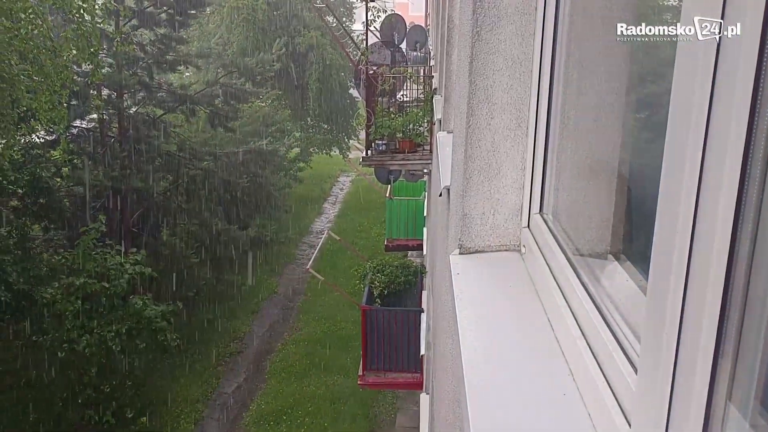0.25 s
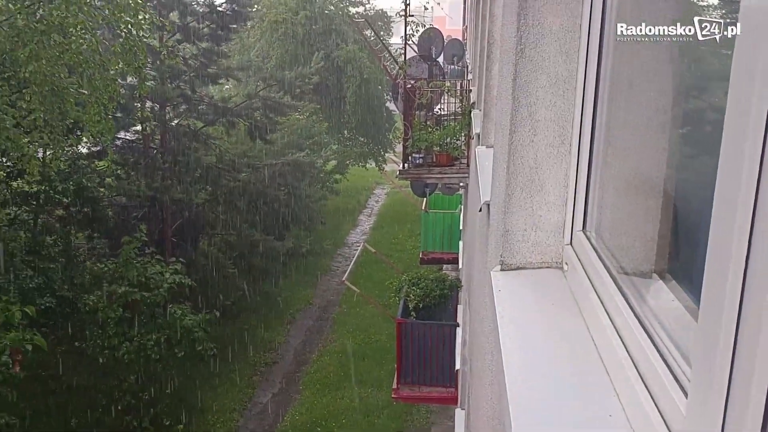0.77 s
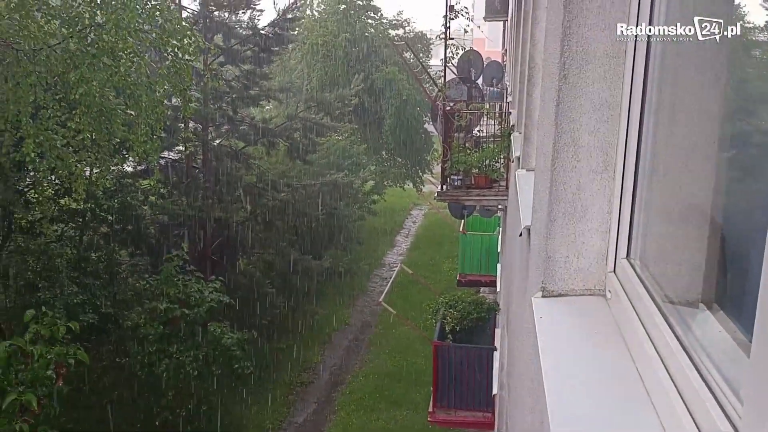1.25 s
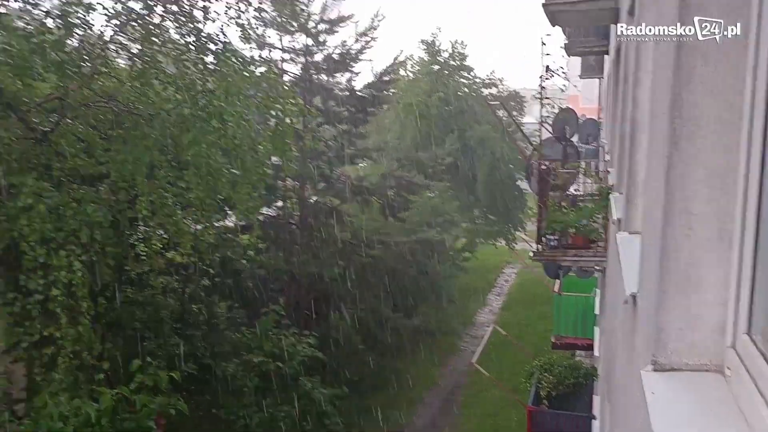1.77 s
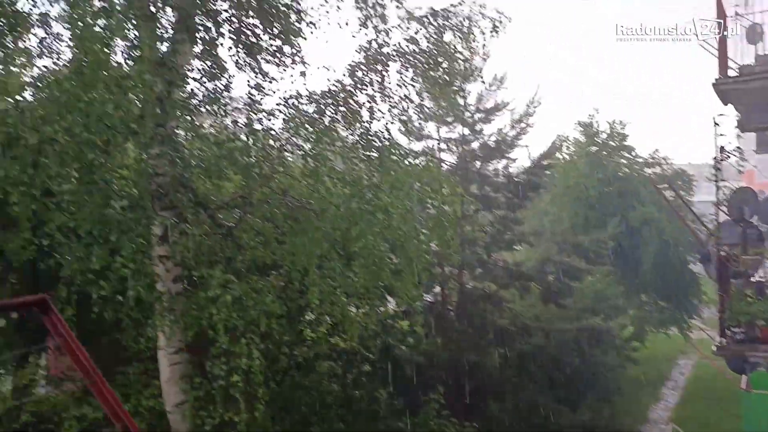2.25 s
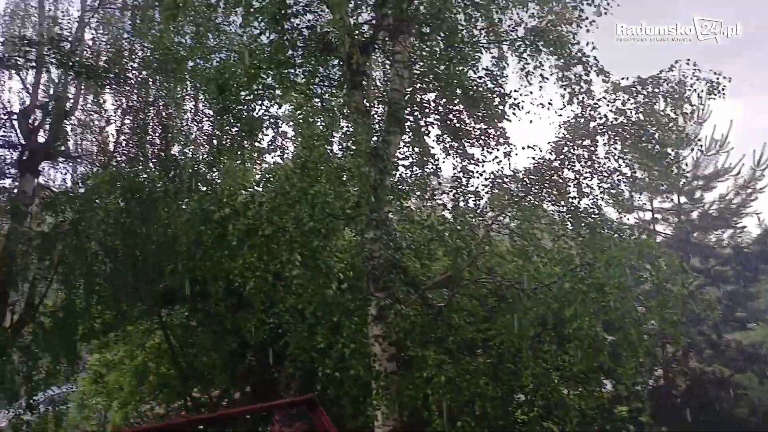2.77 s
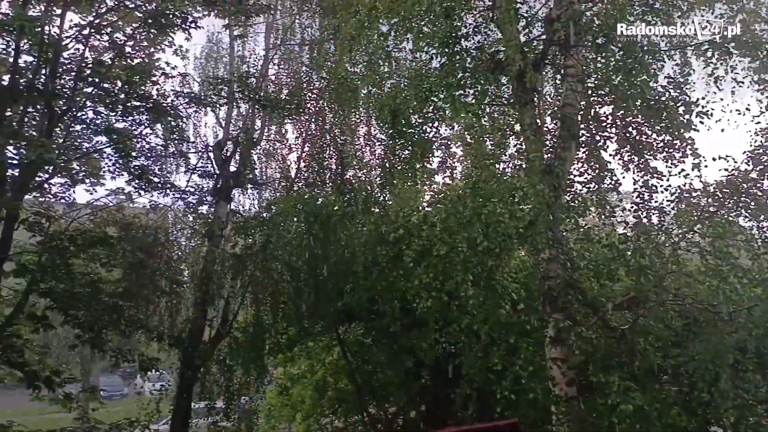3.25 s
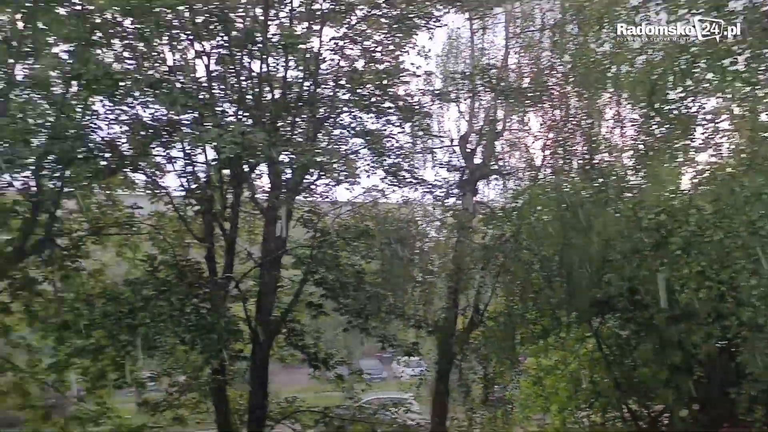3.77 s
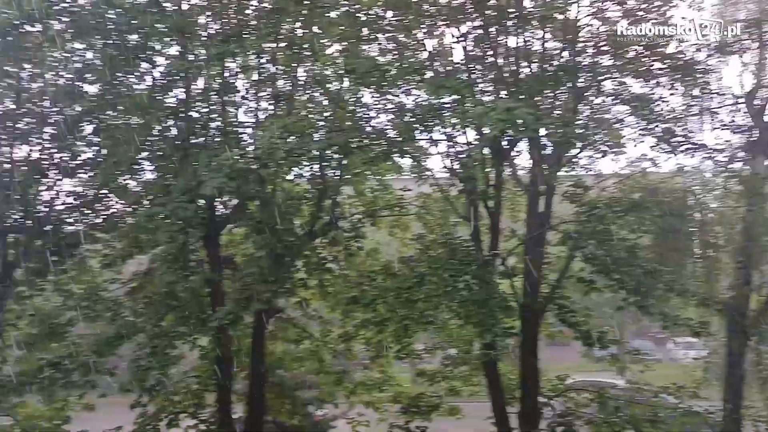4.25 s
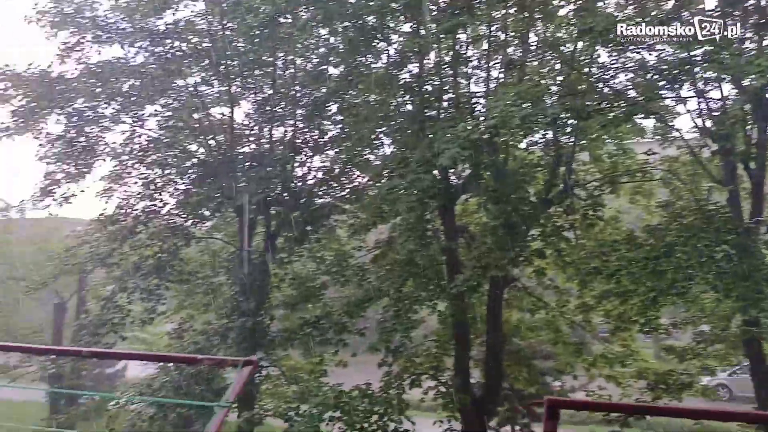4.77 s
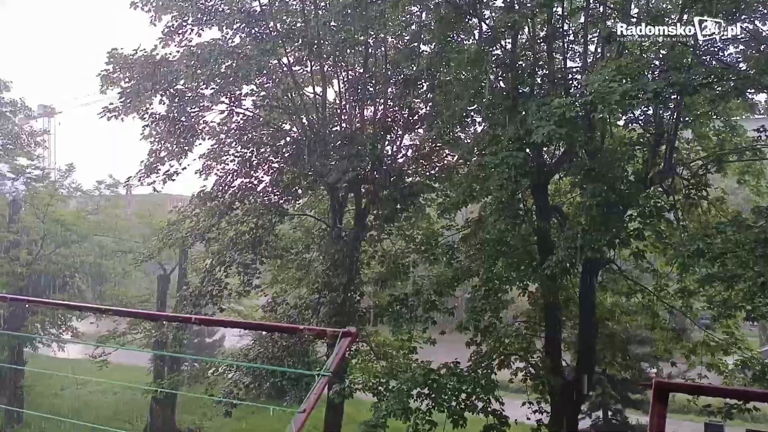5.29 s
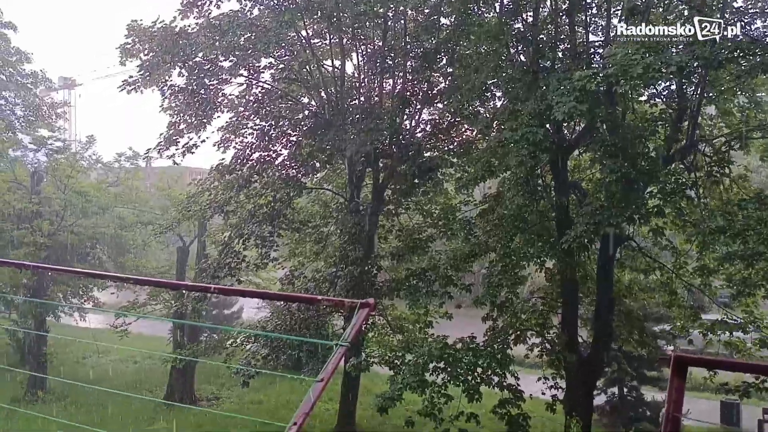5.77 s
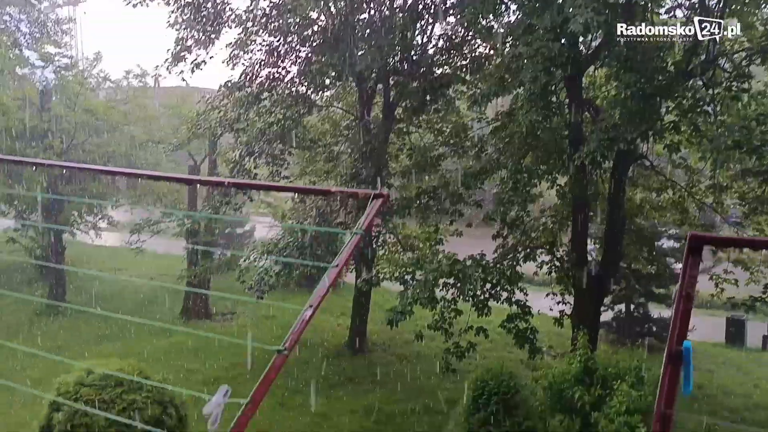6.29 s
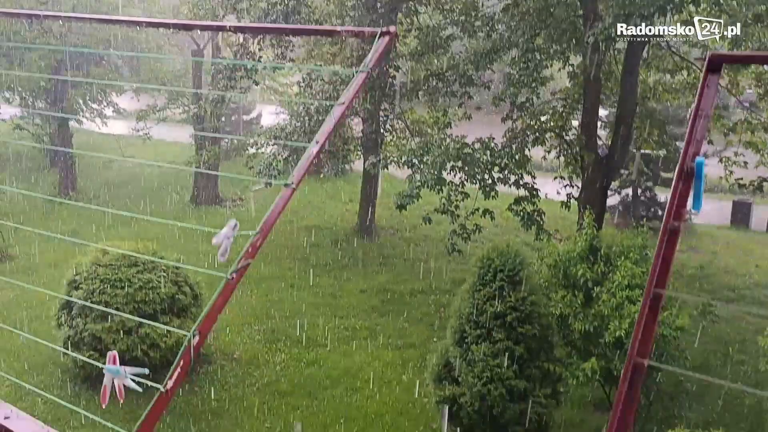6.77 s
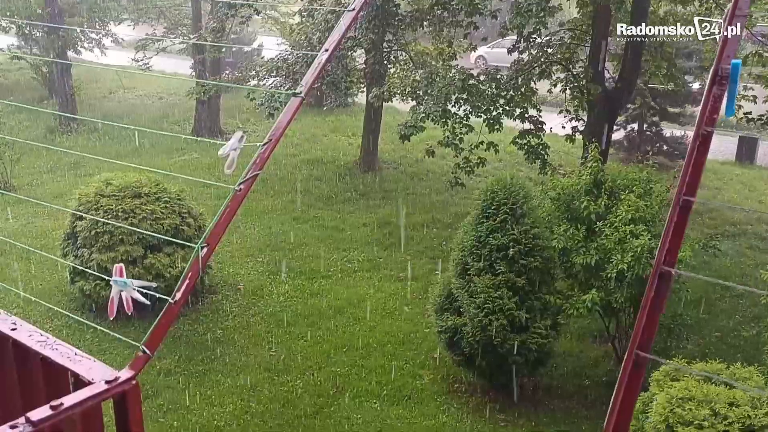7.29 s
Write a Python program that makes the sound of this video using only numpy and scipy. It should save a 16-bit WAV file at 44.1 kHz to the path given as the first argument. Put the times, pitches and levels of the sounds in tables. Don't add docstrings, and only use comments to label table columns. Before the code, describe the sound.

Outdoors on a balcony above trees and lawn, steady heavy rain makes a dense, even hiss with small pops on leaves. Large drops knock irregularly on sheet metal, clustering around the middle and again after six seconds, with fine ticks and spits close by. Faint gutter gurgling and a distant engine drone lie far beneath. A small phone-like microphone makes it narrow, nearly mono and slightly pumping after hard hits.

```python
import sys
import numpy as np
from scipy import signal
from scipy.fft import rfft, irfft, dct
from scipy.io import wavfile

SR = 44100
rng = np.random.default_rng(int(sys.argv[2]) if len(sys.argv) > 2 else 0)


def output_pcm(signal):
    pcm = np.clip(np.atleast_2d(signal).T, -1, 1) * 32767
    wavfile.write(sys.argv[1], SR, np.round(pcm).astype(np.int16))


def field_ratio(decibels):
    return 10 ** (np.asarray(decibels, dtype=float) / 20)


N = 332072


def rms_one(x):
    return x / np.sqrt(np.mean(x ** 2) + 1e-20)


def in_time(rows):
    s, *columns = np.transpose(rows)
    return [np.interp(np.arange(N) / SR, s, c) for c in columns]


def band(x, low_hz, high_hz, order=2):
    sos = signal.butter(order, [low_hz, min(high_hz, 0.45 * SR)], "band", fs=SR, output="sos")
    return signal.sosfilt(sos, x)


def brick_wall(x, low_hz, high_hz):
    hz = np.arange(N // 2 + 1) * SR / N
    return irfft(rfft(x) * (hz > low_hz) * (hz < high_hz), N)


def drift(rate_hz):
    r = np.exp(-80 * np.pi * rate_hz / SR)
    chance = rng.standard_normal(N // 40 + 2002)
    slow = signal.lfilter([1], [1, -2 * r, r * r], chance)[2000:]
    return np.interp(np.arange(N) / 40, np.arange(len(slow)), rms_one(slow))


def ring(x, hz, t60):
    r, w = field_ratio(-60 / (t60 * SR)), 2 * np.pi * hz / SR
    return signal.lfilter([0, np.sin(w)], [1, -2 * r * np.cos(w), r * r], x + 1e-18)


def dips(rows, fall_s, rise_s):
    t, out = np.arange(N) / SR, np.zeros(N)
    for s, depth_db, hold in rows:
        corners = [s - fall_s, s + fall_s, s + hold - rise_s / 2, s + hold + rise_s / 2]
        out += depth_db * np.interp(t, corners, [0, 1, 1, 0])
    return out


def gate(rows, shut_db):
    open_s, close_s = 0.029, 0.041
    t, out = np.arange(N) / SR, shut_db + np.zeros(N)
    for s, length, level_db in rows:
        opened = s + open_s / 2
        closing = max(s + length - close_s / 2, opened)
        shape = np.interp(t, [s - open_s, opened, closing, s + length + close_s], [0, 1, 1, 0])
        out = np.maximum(out, shut_db + (level_db - shut_db) * shape)
    return out


def drops(per_s, spread_db, cap):
    sizes = field_ratio(spread_db * np.minimum(rng.exponential(1, N), cap)) * rng.choice([-1, 1], N)
    return rms_one(sizes * (rng.random(N) < per_s / SR))


def rain():
    # t/s, rain level/dB, spray against the rain/dB
    downpour = [
        (0.0, -21.5, -0.5),
        (1.03, -22, 1),
        (1.32, -21.5, 1),
        (1.51, -21.5, 0),
        (5.3, -21.5, 1),
        (6.52, -22, 0.5),
        (7.17, -21.5, 1),
        (7.53, -22.5, 2.5),
    ]
    rain_db, spray_db = in_time(downpour)
    together, hiss = drift(7.7), 0
    white, edges = rng.standard_normal((2, N)), 90 * 2 ** np.arange(0, 8.1, 0.5)
    for k, (low, high) in enumerate(zip(edges, edges[1:])):
        flicker_db = 0.36 * together + 1.16 * drift(14.3)
        hiss = hiss + field_ratio(flicker_db + spray_db * (low > 7000)) * band(white[k % 2], low, high)

    near, dealt, pops = drops(1200, spread_db=4.5, cap=3.37), rng.integers(0, 14, N), 0
    for k, hz in enumerate(np.geomspace(600, 7000, 14)):
        pops = pops + rms_one(ring(near * (dealt == k), hz, 11.8 / hz)) * np.sqrt(hz)
    spray = band(drops(200, spread_db=1.0, cap=6.0), 8100, 17000)
    wet = rms_one(hiss) + field_ratio(-15.0) * rms_one(pops) + field_ratio(-7.5) * rms_one(spray)
    return field_ratio(rain_db) * rms_one(colour(wet))


def colour(x):
    # f/Hz, level/dB per Hz
    body = [(53, -50), (90, -35), (157, -37), (205, -35), (323, -24), (415, -17), (582, -8), (761, -5.5),
            (963, -7.5), (1350, -3.5), (2390, -1), (3630, -3), (4440, -8.5), (5000, -9), (6500, -39),
            (11000, -120)]
    # f/Hz, level/dB per Hz
    top = [(2940, -30), (5000, 0.5), (5720, -1), (6540, -10), (7160, -6.5), (8550, -4), (10400, -19.5),
           (15100, -12), (15700, -31)]
    points = [p for p in body if p[0] < 4900]
    points += [(hz, db - 9) for hz, db in top if 4900 < hz < 15750]
    point_hz, point_db = np.array(points).T
    hz = np.arange(4097) * SR / 8192 + 1
    cepstrum = irfft(np.log(field_ratio(np.interp(np.log(hz), np.log(point_hz), point_db))))
    cepstrum[1:4096] *= 2
    cepstrum[4097:] = 0
    return signal.fftconvolve(x, irfft(np.exp(rfft(cepstrum))))[:N]


def knocks():
    # t/s, peak level/dB, f/Hz, t60/s
    big = [(0.2622, -5.5, 2470, 0.16), (0.4326, -15, 2800, 0.03), (1.3481, -12, 3240, 0.073),
           (1.502, -8, 2400, 0.05), (1.511, -8, 2400, .05), (1.5904, -7, 2940, 0.091),
           (2.2994, -8, 2400, 0.21), (3.2478, -5.5, 2440, 0.13), (3.2896, -2, 2410, 0.052),
           (3.398, -8, 2500, 0.13), (3.5192, -9, 2500, 0.17), (3.56, -1.5, 2400, 0.22),
           (3.699, -3, 2380, 0.07), (3.75, -10, 2500, 0.3), (3.7888, -5, 2950, 0.1), (3.93, -8, 2650, 0.17),
           (4.8778, -5, 2930, 0.17), (4.978, -9, 2560, 0.15), (5.1537, -4.5, 2010, 0.054),
           (5.1976, -3.5, 2400, 0.14), (5.4194, -6, 3050, 0.058), (5.546, -8, 2340, 0.053),
           (5.9107, -3.5, 2000, 0.065), (5.9783, -5, 2490, 0.17), (6.3994, -10, 2280, 0.12),
           (6.4357, -1.5, 1800, 0.045), (6.5003, -8, 2630, 0.092), (6.6458, -5, 2480, 0.16),
           (6.7592, -7.5, 2660, 0.098), (7.2198, -8, 1880, 0.071)]
    out, t = np.zeros(N + 9000), np.arange(9000) / SR
    chance = rng.standard_normal((len(big), 9000))
    for (s, peak_db, hz, t60), noise in zip(big, chance):
        splash = band(noise * np.exp(-t / 0.0045), 1000, 3800, order=3)
        dying = np.minimum(t / 0.00057, 1) * field_ratio(-60 * t / min(t60, 0.28))
        cluster = band(noise[::-1], hz - 250, hz + 250)[::-1]
        modes = np.tanh(0.41 * rms_one(cluster)) * dying
        share = np.clip(0.56 - 0.012 * peak_db, 0, 1)
        hit = (1 - share) * splash / abs(splash).max() + share * modes / abs(modes).max()
        out[round(s * SR):][:9000] += field_ratio(peak_db - 5.0) * hit
    return band(out[:N], 590, 6400, order=3)


def hard_drops():
    # [(f/Hz, level/dB, t60/s) ..]
    hardest = [
        (0.4727, [(1200, -15, .005), (1520, -9, .007), (1830, -12, .018), (2600, -15, 0.005), (4830, -13, .005)]),
        (6.2915, [(2500, -8, .012), (2850, -10, .007), (3200, -8, 0.009), (4600, -11, .006), (5300, -10, 0.006), (8600, -26, .008)]),
    ]
    out = np.zeros(N)
    for s, modes in hardest:
        slap = np.zeros(N)
        slap[[round((s + lag) * SR) for lag in (0, 0.0006, 0.0019)]] = [0.22, -1, 0.22]
        for hz, level_db, t60 in modes:
            out += field_ratio(level_db) * ring(slap, hz, t60)
    return band(out, 900, 7300, order=3)


def ticks():
    # t/s, port click level/dB, upper treble level/dB
    fine = [(0.1997, -27, -28), (0.6604, -12.5, -37), (0.9, -9, -30), (1.0545, -13, -36),
            (1.2525, -11, -30), (1.4426, -16, -39), (1.5136, -22, -36), (2.3034, -14, -37),
            (2.369, -18, -28), (2.6744, -17, -36), (2.8777, -10.5, -39), (3.7479, -20, -37),
            (3.804, -23, -42), (4.0123, -15, -29), (4.6545, -15, -37), (5.0739, -13, -29),
            (5.225, -13, -31), (5.4535, -19, -36), (5.4755, -20, -36), (5.5134, -17, -37),
            (5.6003, -16, -37), (6.4188, -17, -30), (6.4827, -25, -36), (6.5134, -11, -38),
            (6.6468, -20, -38), (6.8194, -16, -37), (6.961, -17, -37), (7.008, -16, -28),
            (7.0394, -20, -31), (7.4383, -11, -28)]
    out, t = np.zeros(N + 900), np.arange(900) / SR
    chance = rng.standard_normal((len(fine), 900))
    for (s, peak_db, upper_db), noise in zip(fine, chance):
        port = band(noise * np.exp(-t / 0.0028), 6900, 9000)
        upper = band(noise * np.exp(-t / 0.0047), 10000, 17200)
        at = out[round(s * SR):][:900]
        at += field_ratio(peak_db - 5.5) * port / abs(port).max()
        at += field_ratio(upper_db + 6.0) * upper / abs(upper).max()
    return out[:N]


def spits():
    # t/s, peak level/dB, lower edge f/Hz
    shatters = [
        (.432, -16, 5350),
        (1.252, -23, 14000),
        (3.288, -25, 12500),
        (3.598, -31, 10500),
        (3.697, -26, 11800),
        (6.419, -25, 13000),
        (7.04, -18, 14200),
        (7.438, -25, 12600),
    ]
    out, t = np.zeros(N + 900), np.arange(900) / SR
    chance = rng.standard_normal((len(shatters), 900))
    for (s, peak_db, hz), noise in zip(shatters, chance):
        burst = band(noise * np.exp(-t / 0.0018), hz, hz * 1.19)
        out[round(s * SR):][:900] += field_ratio(peak_db) * burst / abs(burst).max()
    return out[:N]


def ping():
    t = np.clip(np.arange(N) / SR - 0.198, 0, None)
    swell = np.minimum(t / 0.012, 1) * field_ratio(-60 * t / 0.25)
    return field_ratio(-20.5) * swell * np.sin(2 * np.pi * 4780 * t)


def gurgle(sink_db):
    # start t/s, length/s, level/dB
    low_open = [(0.248, 0.14, -50), (1.033, 0.062, -51), (1.678, 0.04, -44), (1.771, 0.046, -48),
                (1.866, 0.12, -46), (2.906, 0.058, -44), (3.022, 0.046, -44), (3.327, 0.108, -51),
                (3.717, 0.116, -44.5), (4.035, 0.032, -50), (4.205, 0.036, -47), (4.412, 0.038, -49),
                (4.59, 0.03, -50), (5.044, 0.091, -44), (5.852, 0.041, -49), (6.13, 0.034, -44),
                (6.484, 0.032, -50)]
    # start t/s, length/s, level/dB
    upper_open = [(0.063, 0.04, -48), (0.749, 0.058, -52), (1.462, 0.068, -48), (1.72, 0.43, -44.5),
                  (2.912, 0.11, -47), (3.126, 0.17, -48), (3.32, 0.166, -44), (3.568, 0.32, -42),
                  (3.963, 0.13, -45.5), (4.227, 0.22, -44), (4.608, 0.068, -45), (4.992, 0.62, -45),
                  (6.106, 0.18, -44), (6.464, 0.085, -42), (6.716, 0.11, -46), (6.935, 0.078, -47),
                  (7.106, 0.12, -47.5)]
    low_leak_db = -54.5 - 0.56 * np.arange(N) / SR
    low_db = gate(low_open, low_leak_db) + 2.5 * drift(5.5) + sink_db
    upper_db = gate(upper_open, -66.5) + sink_db
    noise = rng.standard_normal((2, N))
    low = band(noise[0], 286.4, 380, order=3) * field_ratio(0.9 * drift(5.0))
    upper = band(noise[1], 398, 549, order=4) * field_ratio(2.0 * drift(9.3))
    return field_ratio(low_db - 0.2) * rms_one(low) + field_ratio(upper_db + 1.2) * rms_one(upper)


def engine():
    # t/s, f/Hz
    pitch = [(0, 62), (1.6, 62), (2.5, 67), (4.1, 69), (5.2, 75), (6.1, 79), (7.53, 80)]
    # start t/s, length/s, level/dB
    drone_open = [(0.782, 0.066, -63), (1.35, 5.5, -71), (1.383, 0.034, -65), (1.535, 0.27, -64),
                  (2.061, 0.19, -61), (2.389, 1.11, -60), (3.801, 0.56, -59.5), (4.522, 0.07, -62),
                  (4.68, 0.098, -62), (4.83, .05, -57), (4.96, 0.59, -61.5), (5.653, 0.6, -61),
                  (6.378, 0.142, -60), (6.739, 0.044, -62)]
    drone_db = gate(drone_open, -80) + 1.2 * drift(13)
    noise = rng.standard_normal((2, N))
    hz = in_time(pitch)[0] + 2.5 * drift(4.1)
    note = np.sqrt(2) * np.sin(2 * np.pi * np.cumsum(hz) / SR) * field_ratio(0.82 * drift(7.4))
    note *= np.clip((drone_db + 73) / 12, 0, 1)
    drone = note + field_ratio(-4.0) * rms_one(band(noise[0], 70, 108))
    sub = field_ratio(-86 + 3.5 * drift(3)) * rms_one(band(noise[1], 18, 60))
    return field_ratio(drone_db) * drone + sub


def scene():
    # t/s, depth/dB, hold/s
    ducks = [(0.484, -6.1, 0.049), (1.173, -5, 0.045), (1.312, -3.5, 0.051), (1.52, -3.5, 0.015),
             (2.13, -1, 0.023), (2.375, -2, 0.027), (2.59, -3.5, 0.027), (3.099, -5, 0.037),
             (3.606, -4, 0.051), (5.479, -5.5, 0.023), (5.924, -4, 0.018), (5.989, -3, 0.031),
             (6.072, -2.2, 0.014), (6.304, -4, 0.061), (6.443, -5, 0.023), (6.52, -1.5, 0.026),
             (6.632, -5.5, 0.013), (6.774, -5, 0.042), (6.871, -2.7, 0.019), (7.359, -6, 0.03)]
    # t/s, depth/dB, hold/s
    gaps = [
        (3.551, -6, .008),
        (1.492, -6, .007),
        (6.636, -3, .008),
    ]
    # t/s, depth/dB, hold/s
    clamps = [
        (.62, -12, 0.065),
        (1.17, -22, 0.09),
        (3.06, -12, .05),
        (4.1, -8, .04),
        (4.7, -12, .05),
        (5.47, -10, 0.057),
        (6.4, -10, .04),
        (6.57, -16, 0.054),
        (7.44, 1, .07),
    ]
    t = np.arange(N) / SR
    leaves = rain()
    rumble = field_ratio(1.0 - 0.5 * t + 3.0 * drift(5)) * band(leaves, 95, 263, order=3)
    high_pass = signal.butter(14, 505, "high", fs=SR, output="sos")
    leaves = signal.sosfilt(high_pass, leaves) + rumble
    duck_db = dips(ducks, fall_s=0.0046, rise_s=0.017)
    gap_db = dips(gaps, fall_s=0.0016, rise_s=0.002)
    sink_db = 0.96 * duck_db + dips(clamps, fall_s=0.013, rise_s=0.03)
    mono = (leaves * field_ratio(duck_db) + knocks()) * field_ratio(gap_db)
    mono = mono + hard_drops() + ticks() + spits() + ping() + gurgle(sink_db) + engine()
    return np.tile(mono, (2, 1))


def starve(x):
    # centre t/s, rounding step level/dB
    starved = [
        (1.192, -21),
        (3.263, -17.5),
        (3.348, -16.5),
        (3.542, -14),
        (3.623, -19.5),
        (3.796, -17.5),
        (4.564, -17.5),
        (5.546, -20.5),
    ]
    out, hz = x.copy(), np.arange(1100) * SR / 2200
    fade = 0.93 * signal.windows.tukey(1100, 0.75)
    uneven_db = 9 * (hz > 9300) + 4 * (abs(hz - 6750) < 750) + 7 * (abs(hz - 4400) < 250) - 40 * (hz < 350)
    for s, step_db in starved:
        at = slice(round(s * SR) - 550, round(s * SR) + 550)
        step = field_ratio(step_db + uneven_db)
        coarse = dct(np.round(dct(x[:, at], norm="ortho") / step) * step, type=3, norm="ortho")
        out[:, at] += fade * (coarse - x[:, at])
    return out


def part_channels(x):
    # centre t/s, low f/Hz, high f/Hz, level/dB
    splits = [(1.021, 6850.0, 8320.0, -46), (3.041, 4150.0, 5180, -40), (3.041, 12370.0, 13790.0, -53),
              (3.413, 4170.0, 5220.0, -43), (3.413, 11030.0, 12500, -51), (4.458, 6840.0, 8320.0, -43),
              (4.458, 12370.0, 13810.0, -54), (5.735, 4620.0, 6200, -42), (6.014, 4600.0, 5740.0, -42),
              (7.499, 8900.0, 10400.0, -52), (7.499, 11680.0, 13180.0, -54)]
    t, noise = np.arange(N) / SR, rng.standard_normal(N)
    for s, low_hz, high_hz, level_db in splits:
        shape = np.sqrt(np.clip(1.1 - abs(t - s) * SR / 1024, 0, 0.55) / 0.55)
        x = x + field_ratio(level_db) * rms_one(brick_wall(noise, low_hz, high_hz)) * shape * [[1], [-1]]
    return x


def low_pass(x):
    return signal.sosfilt(signal.butter(12, 16280, fs=SR, output="sos"), x)


def record(dry):
    x = part_channels(starve(dry))
    mix = brick_wall(np.clip(x, -1, 1), 0, 15830)
    return low_pass(mix)


dry = scene()
out = record(dry)
output_pcm(out)
```